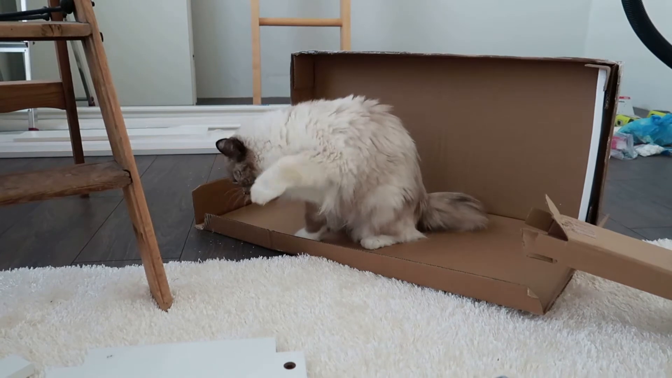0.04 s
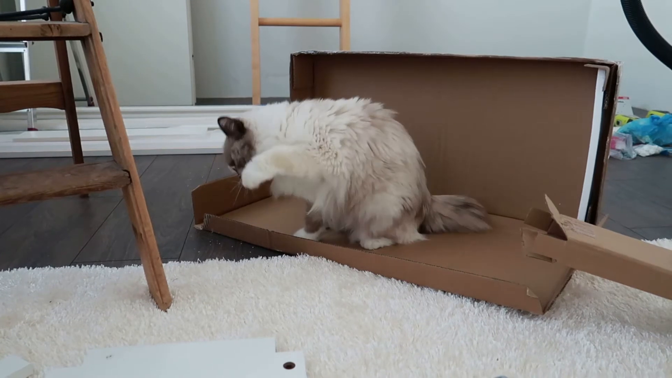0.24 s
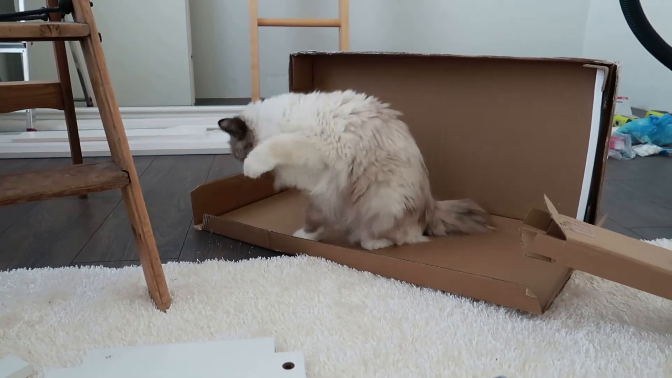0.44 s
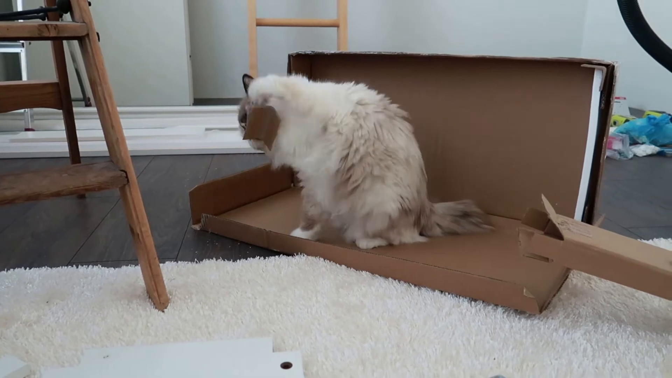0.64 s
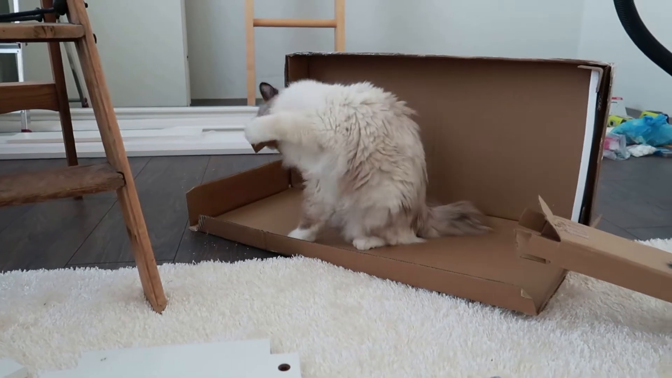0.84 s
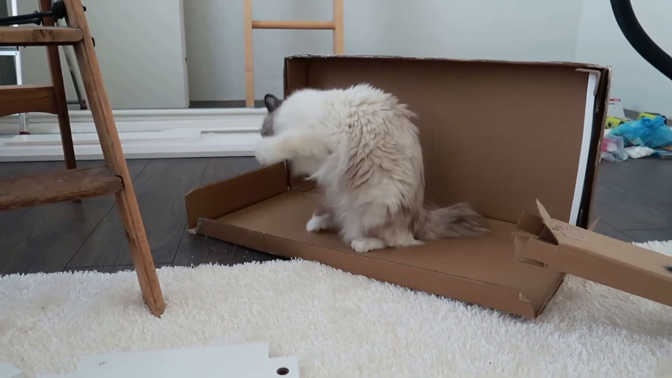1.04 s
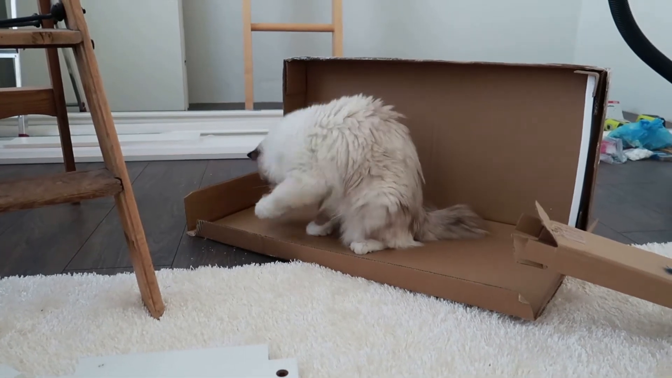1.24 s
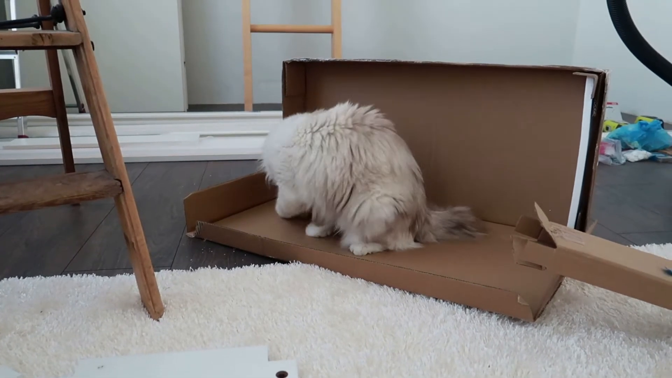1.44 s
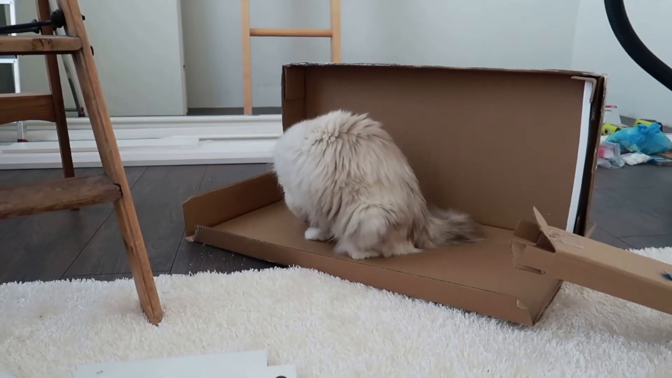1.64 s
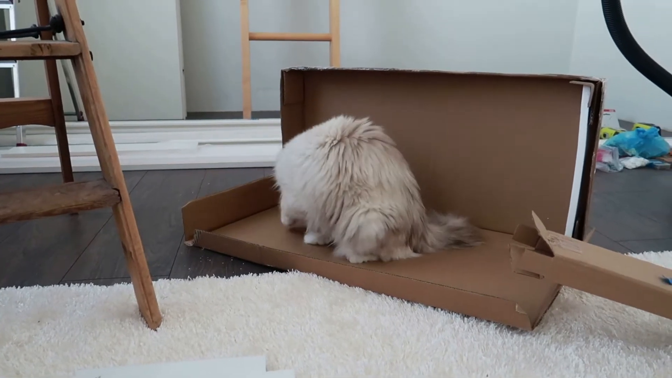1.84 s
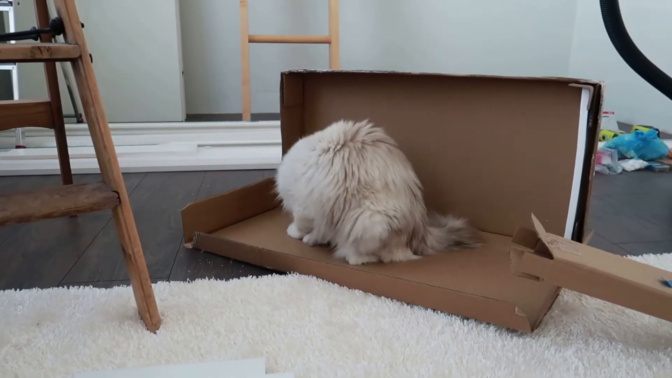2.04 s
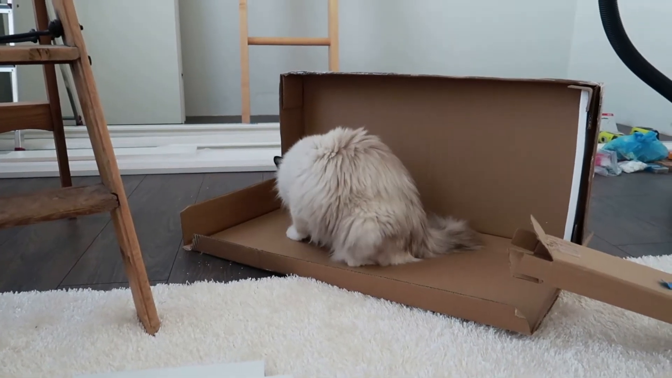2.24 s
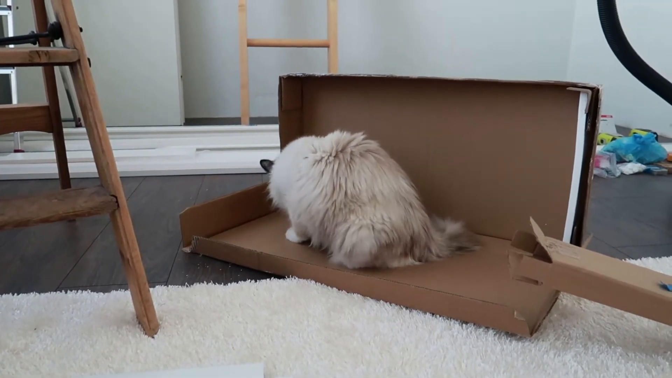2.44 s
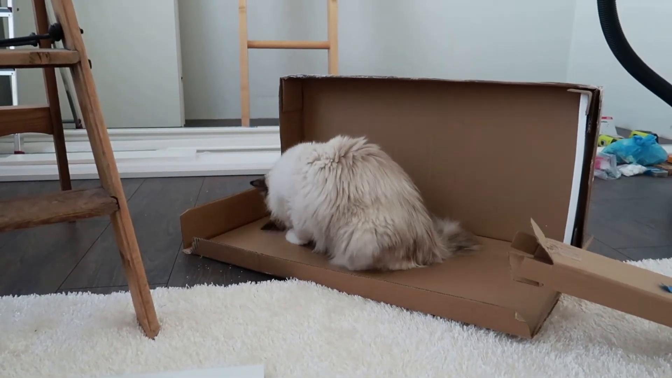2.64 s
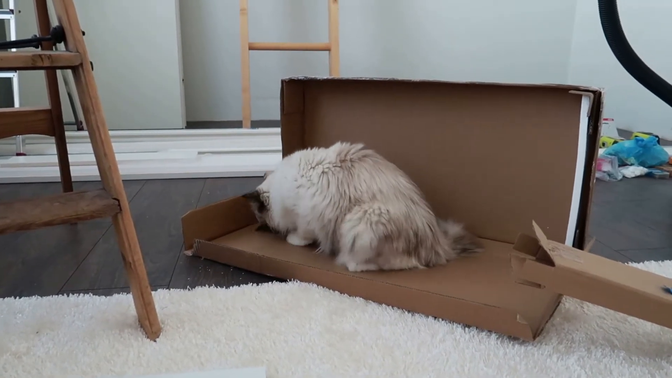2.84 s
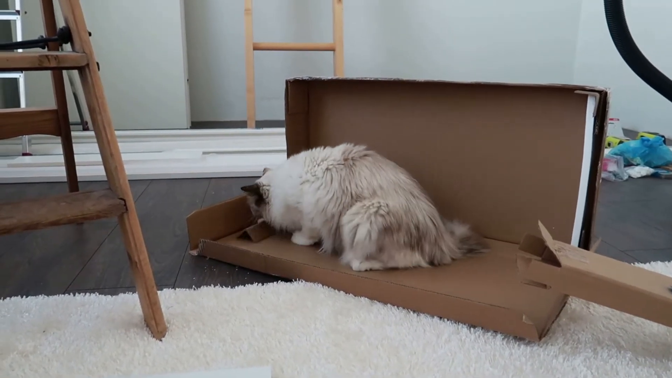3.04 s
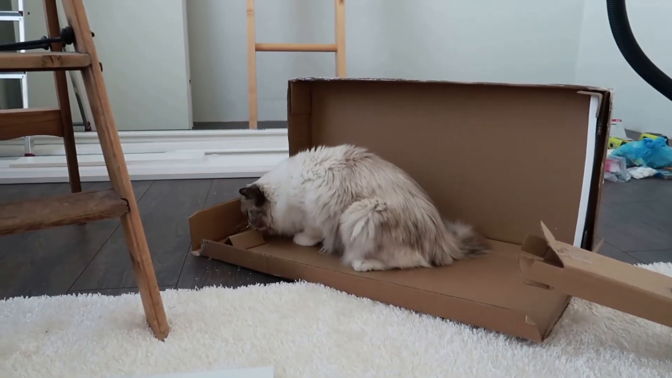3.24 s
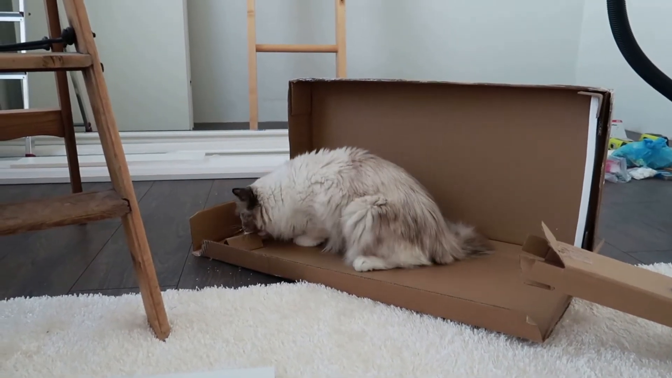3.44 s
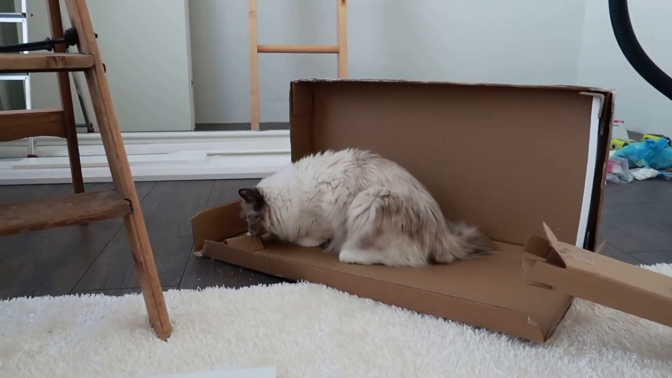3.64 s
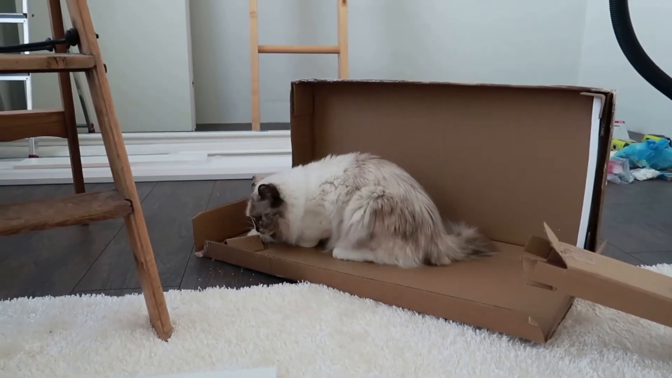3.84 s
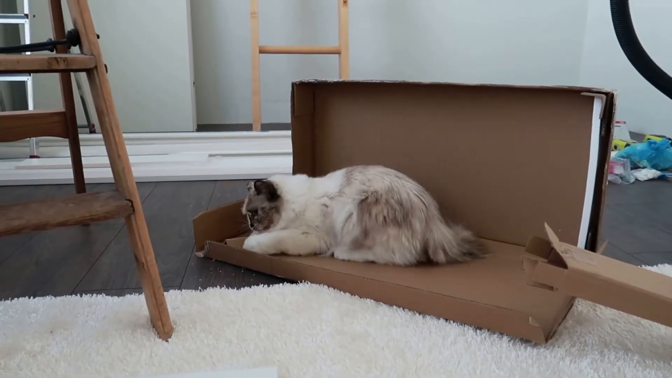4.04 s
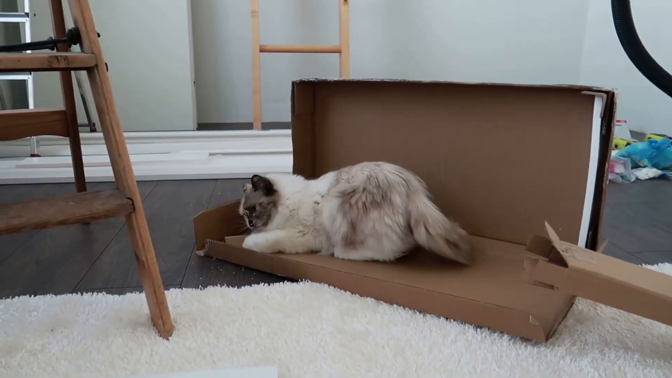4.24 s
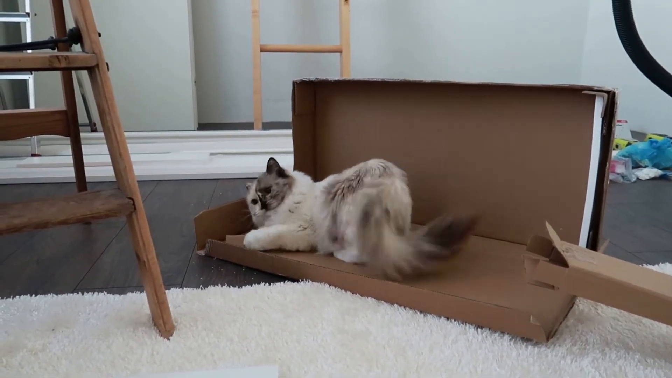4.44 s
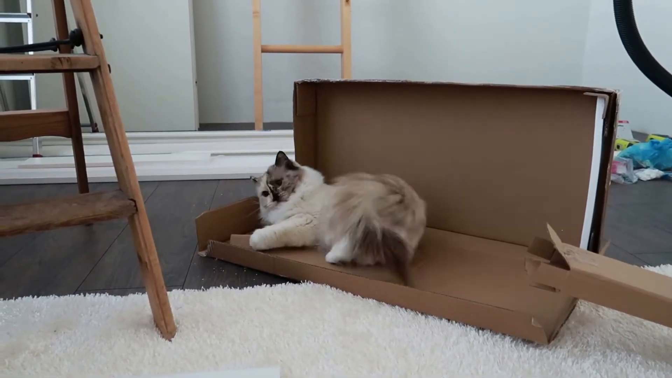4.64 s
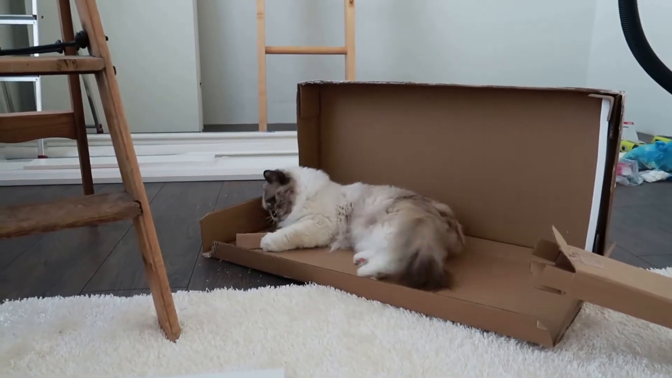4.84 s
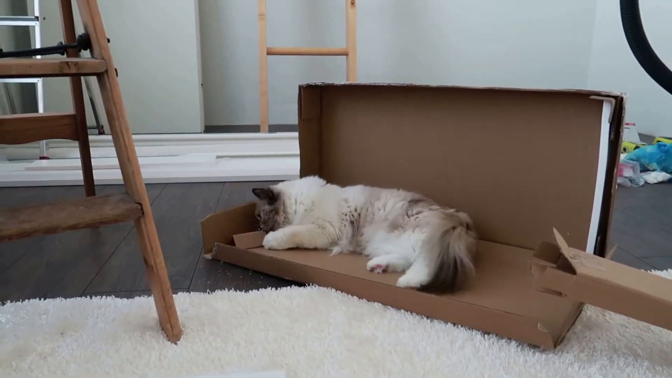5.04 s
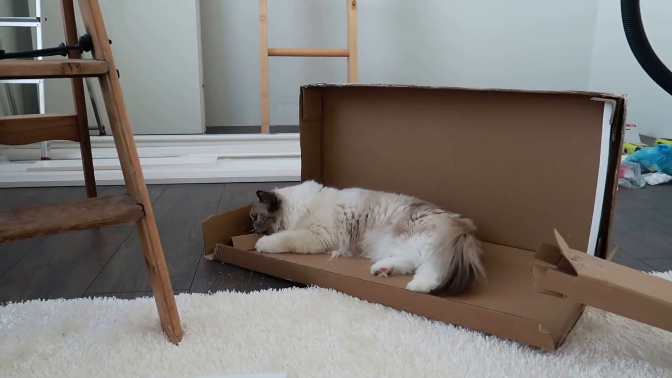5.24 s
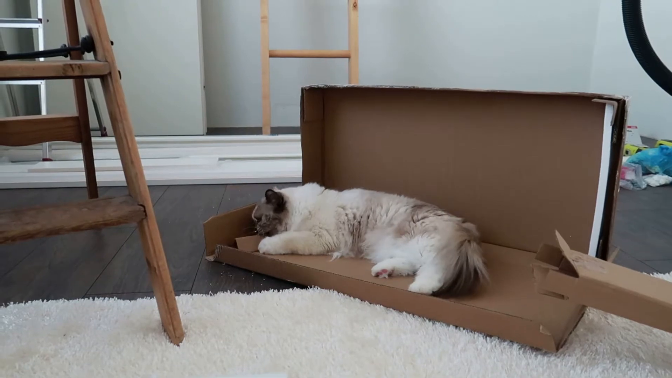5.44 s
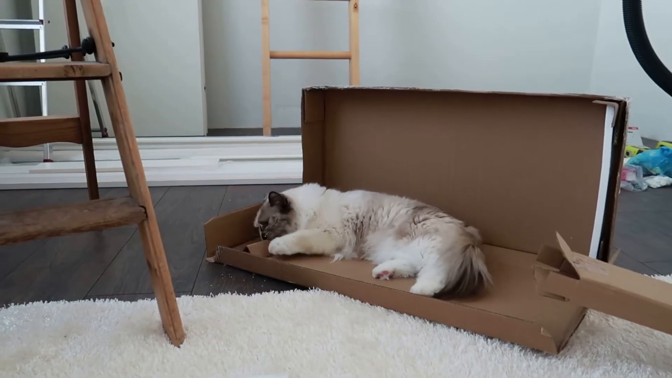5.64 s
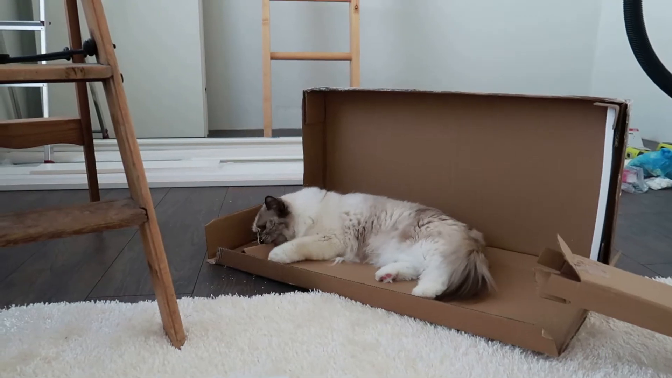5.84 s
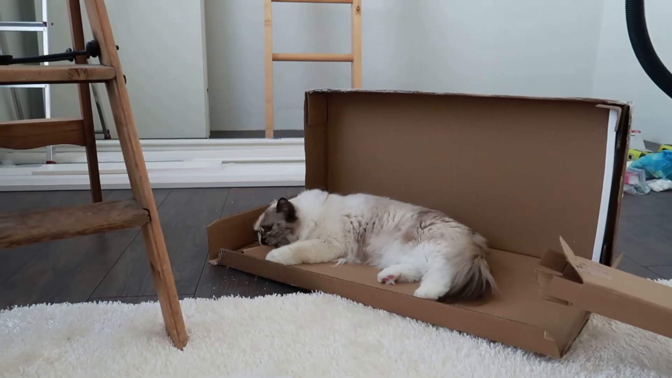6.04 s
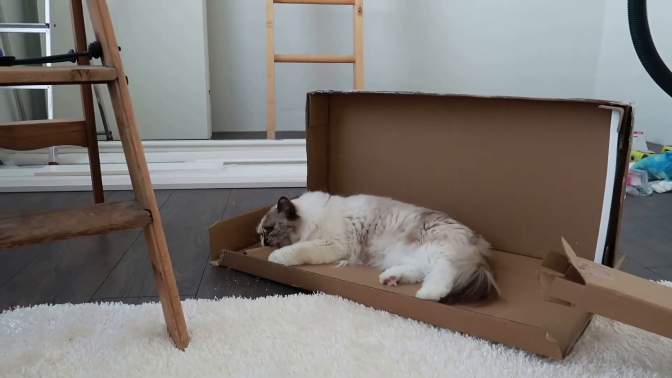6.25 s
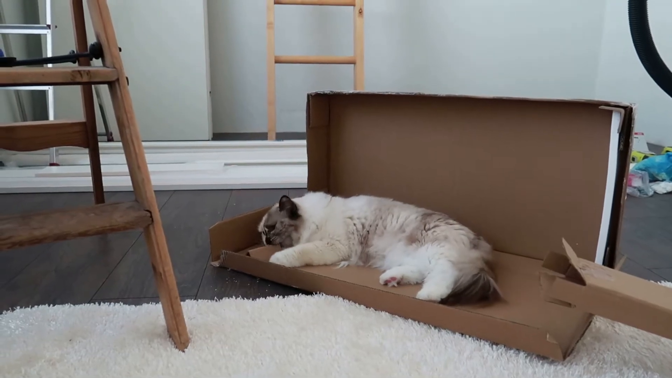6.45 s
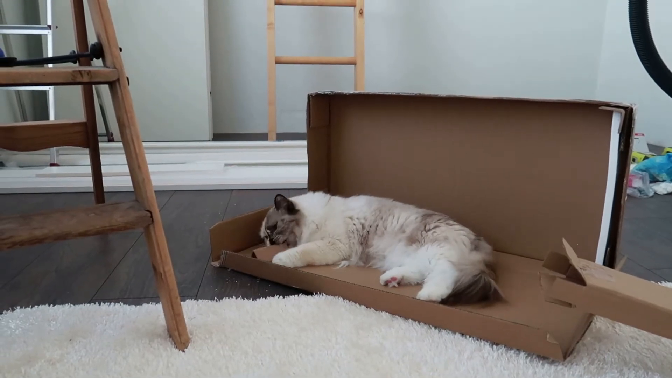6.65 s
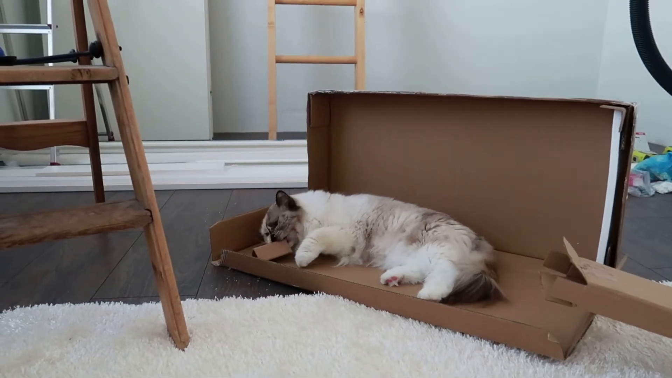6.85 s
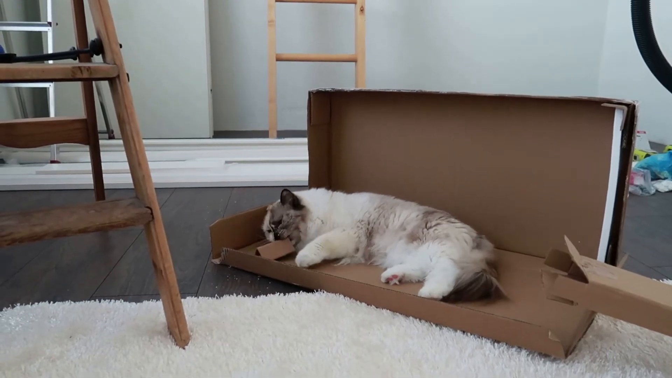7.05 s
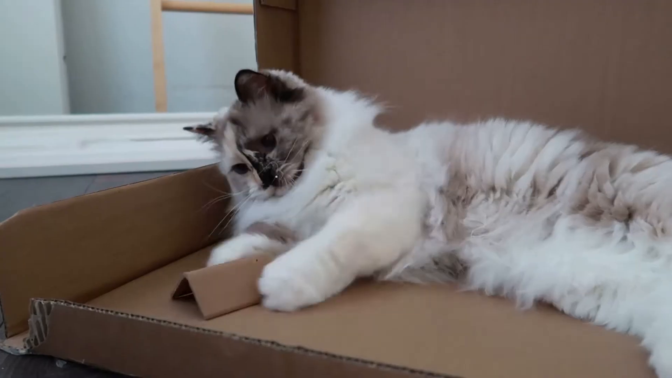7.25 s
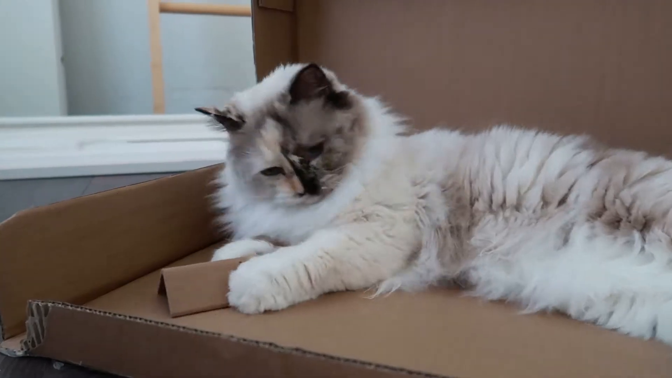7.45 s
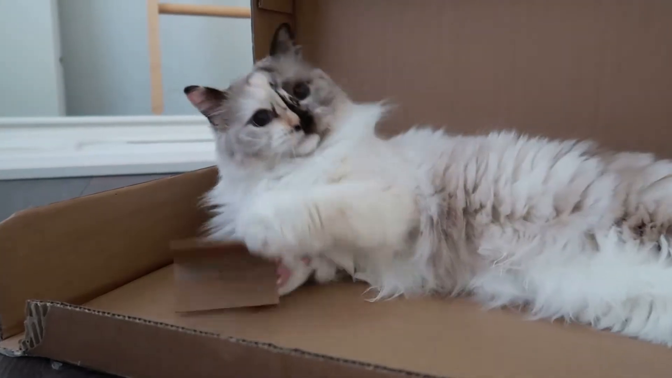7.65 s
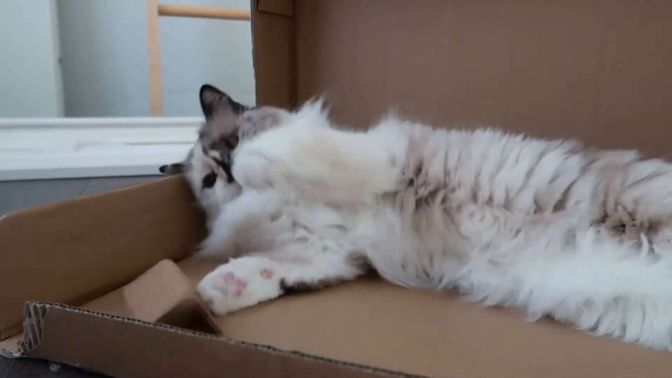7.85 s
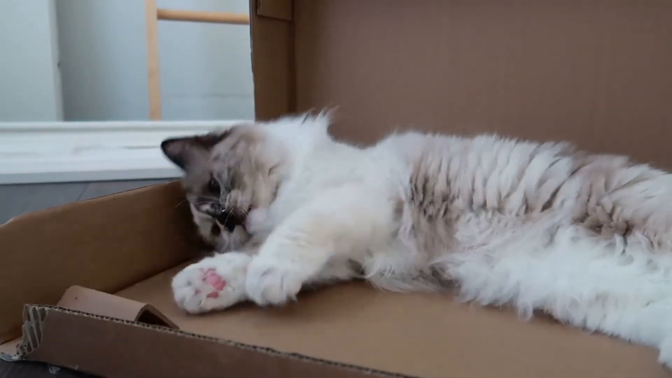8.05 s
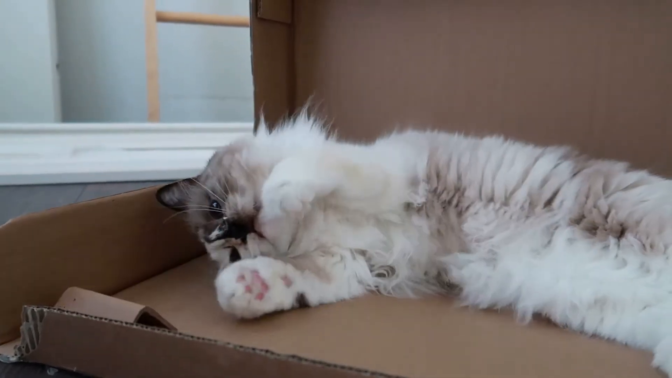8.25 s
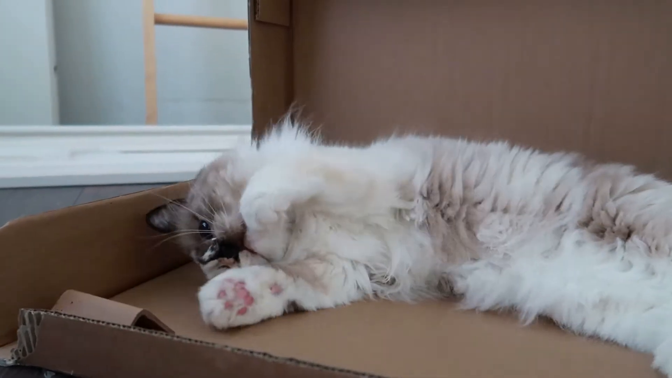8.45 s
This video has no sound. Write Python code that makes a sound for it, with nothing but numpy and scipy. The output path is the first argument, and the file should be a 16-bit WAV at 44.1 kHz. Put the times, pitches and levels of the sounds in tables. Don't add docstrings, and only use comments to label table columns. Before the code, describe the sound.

Loose cardboard clatters sharply near the start and end, with quiet papery scuffs and claw ticks between, over faint room air and mains hum.

```python
import sys
import numpy as np
from scipy import signal
from scipy.fft import rfft, irfft, next_fast_len
from scipy.io import wavfile
from scipy.ndimage import uniform_filter1d

SR = 44100
rng = np.random.default_rng(int(sys.argv[2]) if len(sys.argv) > 2 else 0)


def master(y):
    cut = np.clip(np.atleast_2d(y).T, -1, 1)
    pcm = np.round(cut * 32767)
    wavfile.write(sys.argv[1], SR, pcm.astype(np.int16))


def field_ratio(decibels):
    return 10 ** (np.asarray(decibels, dtype=float) / 20)


N = 375222
T = np.arange(N) / SR
PAD = next_fast_len(N)
HZ = np.maximum(np.fft.rfftfreq(PAD, 1 / SR), 1)

# start in seconds, peak in dB, centre in Hz, crack in dB,
# level of the drag that follows in dB.
TICKS = [(0.7965, -34, 3070, -50, -45.5), (1.1413, -48, 2100, -55, -51), (2.0472, -39, 3060, -55, -37.5),
         (3.1469, -54, 2850, -44, -51), (3.4927, -52, 2060, -40, -40), (4.1704, -37.5, 1340, -48, -34.5),
         (4.1914, -42, 1460, -50, -37.5), (4.4861, -40, 2080, -53, -36), (4.7041, -37, 1362, -56, -35),
         (5.1220, -50, 2100, -46, -47), (5.3005, -36, 1520, -46, -36.5), (5.3010, -34, 3070, -60, -47),
         (6.115, -44.5, 1490, -58, -38.5), (6.6448, -47, 2070, -52, -45), (7.358, -22, 3750, -40, -38)]


def rms_one(x):
    return x / np.sqrt(np.mean(x ** 2) + 1e-20)


def at_hz(points, hz):
    table_hz, value = np.transpose(points)
    return np.interp(np.log(hz), np.log(table_hz), value)


def band(x, low_hz, high_hz):
    return signal.sosfilt(signal.butter(2, [low_hz, high_hz], "band", fs=SR, output="sos"), x)


def drift(rate):
    knots = rng.standard_normal(int(N / SR * 60))
    return np.interp(T * rate, np.arange(len(knots)), knots) * 0.8


def spread(mid, side, colour_db, width):
    mid = rfft(mid, PAD) * field_ratio(colour_db)
    side = rfft(side, PAD) * field_ratio(colour_db + at_hz(width, HZ))
    return np.array([mid + side, mid - side])


def layers(spectra, centres_hz):
    shares = [np.interp(np.log(HZ), np.log(centres_hz), one) for one in np.eye(len(centres_hz))]
    return [irfft(spectra * share, PAD)[:, :N] for share in shares]


def grains(per_s, uneven_db):
    size = field_ratio(uneven_db * np.minimum(rng.exponential(1, N), 5)) * rng.choice([-1, 1], N)
    return size * (rng.random(N) < per_s / SR)


def add_contact(power, layer_laws, start, rise, hold, pressure_db, bright_db):
    swell_db = 17
    i = int(start * SR)
    t = T[:min(SR, N - i)]
    rise_db = np.minimum(swell_db * (t / max(rise, 1e-3) - 1), 0)
    for row, (over_db, share, release) in zip(power, layer_laws):
        shape_db = np.minimum(rise_db, release * (rise + hold - t))
        row[i:i + len(t)] += field_ratio(2 * (pressure_db + over_db + share * bright_db + shape_db))


def contacts():
    # start in seconds, rise in seconds, hold in seconds, pressure in dB, brightness in dB.
    strokes = [(0.49, 0.059, 0.086, -73.5, 16), (2.391, 0.08, .01, -46, -0.5), (2.5, 0.13, 0.13, -45.5, 1),
               (2.872, 0.19, 0.12, -48.5, 4), (3.06, 0.17, 0.028, -46, 0.5),
               (3.433, 0.073, 0.05, -50.5, -2), (3.6, .1, 0.079, -64.5, 14.5), (3.868, 0.035, .01, -59, -6),
               (4.02, 0.036, .01, -58.5, -5), (4.4, 0.042, .02, -64.5, 19),
               (4.454, 0.068, 0.093, -51, -3.5), (4.584, 0.17, .01, -48.5, 1),
               (4.838, 0.097, 0.071, -43.5, -1), (5.048, 0.092, .01, -48, -1.5),
               (5.292, 0.062, 0.011, -49.5, -30), (5.485, 0.12, 0.18, -48.5, -1),
               (6.054, 0.13, 0.013, -52.5, -13), (6.598, 0.05, 0.026, -48, -5.5),
               (7.125, 0.017, .03, -44, -8), (7.143, 0.038, 0.0076, -41.5, -6.5),
               (7.2, 0.024, .005, -41.5, -1), (7.266, 0.042, 0.17, -62, 12),
               (7.549, 0.093, .02, -46.5, 2.5), (7.655, 0.033, .005, -46.5, 10.5)]
    # start in seconds,
    # hold in seconds, pressure in dB, brightness in dB, panel pitch in Hz.
    skids = [(1.268, 0.071, -31.5, -1, 520), (1.398, 0.0086, -28, -9.5, 690), (1.53, 0.065, -35.5, 2, 695),
             (1.56, 0.1, -33.5, -0.5, 763), (1.67, 0.097, -53.5, 10.5, 622.7),
             (7.345, 0.0059, -42.5, 20.5, 695), (7.35, 0.0096, -57.5, 17.5, 693.4),
             (7.71, 0.024, -49, 14.5, 901), (7.888, 0.011, -39, 5, 503), (7.94, 0.039, -45, 17.5, 511.5),
             (8.0, .07, -46, 10.5, 610), (8.105, 0.088, -52, 13.5, 906)]
    # time in seconds, pitch in Hz.
    panel_path = [(0, 560), (2.0, 610), (2.44, 680), (2.6, 560), (2.8, 550), (3.03, 650), (3.4, 600),
                  (4.35, 580), (4.5, 660), (4.93, 750), (5.1, 640), (5.4, 520), (5.62, 715), (5.9, 575),
                  (6.4, 590), (6.67, 725), (6.9, 530), (7.3, 660)]
    # level over pressure in dB,
    # share of the brightness, release in dB per second.
    fur_laws = [(-1.7, 0.036, 120), (-4.5, 0.1, 77), (-6.5, 0.63, 144), (-6.5, 0.79, 131)]
    # level over pressure in dB, share of the brightness, release in dB per second.
    card_laws = [(3, 0.15, 350), (-2.8, 0.84, 190), (-11.5, 0.77, 570), (-17, 0.92, 230)]
    # level over pressure in dB, share of the brightness, release in dB per second.
    claw_laws = [(-21.5, 0.05, 150), (-15.5, .3, 120), (-20.5, .8, 200), (-23, 1.01, 140)]
    resting_db = [-77.5, -76, -78, -75]
    snap_s, claw_drag_s = 0.0013, 0.0033

    power = np.outer(field_ratio(resting_db) ** 2, np.ones(N))
    panel_hz = np.interp(T, *np.transpose(panel_path))
    for stroke in strokes:
        add_contact(power, fur_laws, *stroke)
    for s, *_, drag_db in TICKS:
        add_contact(power, claw_laws, s, snap_s, claw_drag_s, drag_db, 0)
    for s, hold, pressure_db, bright_db, hz in skids:
        add_contact(power, card_laws, s, snap_s, hold, pressure_db, bright_db)
        panel_hz[(T >= s) & (T < s + hold + 0.1)] = hz
    return uniform_filter1d(np.sqrt(power), size=120), panel_hz


def sliding():
    # frequency in Hz, level in dB per Hz.
    rub_colour = [(71, -41), (120, -12), (128, -15), (319, 1), (432, -9), (563, -12), (796, -4.5),
                  (975, -12), (1790, -3.5), (2070, -2.5), (2390, -1.5), (12100, -29.5), (15500, -36.5)]
    # centre in Hz, width in Hz, height in dB.
    board_peaks = [(1330, 140, 4), (2061, 83, 8.5), (2790, 26, -0.5), (3114, 220, 5.5), (3660, 290, 8),
                   (4380, 53, 9), (4980, 69, 5.5), (5710, 110, 7.5), (6340, 200, 5.5), (6900, 90, 6.5)]
    # frequency in Hz, side minus mid in dB.
    rub_width = [(100, -28), (300, -17), (700, -14.5), (1290, -18), (2380, -14.5), (4400, -9.5),
                 (8120, -5.5), (15000, 5)]

    gains, panel_hz = contacts()
    peaks_db = sum(db / (1 + (2 * (HZ - hz) / width) ** 2) for hz, width, db in board_peaks)
    fibres = grains(6000, uneven_db=2.5), grains(6000, uneven_db=2.5)
    rub = spread(*fibres, at_hz(rub_colour, HZ) + peaks_db, rub_width)
    low, *upper = map(rms_one, layers(rub, [800, 1750, 3600, 5300]))
    slow = band(rng.standard_normal((2, N)), 15.3, 73)
    phase = 2 * np.pi * np.cumsum(panel_hz) / SR
    panel = rms_one(slow[0] * np.cos(phase) + slow[1] * np.sin(phase))
    low = rms_one(low + field_ratio(-1.0) * panel)
    grip = drift(25)
    waver = [field_ratio(1.1 * grip + 1.3 * drift(14)) for _ in gains]
    return sum(g * w * x for g, w, x in zip(gains, waver, (low, *upper)))


def ring(clicks, hz, t60):
    r, w = field_ratio(-60 / (t60 * SR)), 2 * np.pi * hz / SR
    return signal.lfilter([0, np.sin(w)], [1, -2 * r * np.cos(w), r * r], clicks + 1e-18)


def strike(times, centres, falloff_db, cycles, box_db):
    # frequency in Hz, level in dB, time to fall 60 dB in seconds.
    modes = [(167, -22, 0.033), (213, -15, 0.033), (320, 4.5, 0.015), (373, 10, 0.014), (454, 10, 0.025),
             (537, 7.5, 0.025), (613, 4.5, 0.026), (740, 7, 0.024), (844, -0.5, 0.074), (917, 2, 0.02),
             (960, 1.5, 0.023), (1390, 1, 0.0043), (1656, 3, 0.022), (1646, 6.5, 0.011),
             (1930, 10.5, 0.013), (2080, 10.5, 0.0047), (2450, -4, 0.017), (2620, -2, 0.017),
             (3070, -1, 0.026), (3510, -21, 0.0033), (3510, -10, 0.012), (4370, -24, 0.0025)]
    at, out = np.round(times * SR).astype(int), np.zeros(N)
    luck = field_ratio(2.5 * rng.standard_normal((len(at), len(modes))))
    for k, (hz, db, t60) in enumerate(modes):
        height = 0
        for c_db, c_hz in centres:
            octaves_off = abs(np.log2(hz / c_hz))
            height = height + field_ratio(c_db + db + box_db - falloff_db * octaves_off)
        clicks = np.zeros(N)
        clicks[at] = height * luck[:, k]
        out += ring(clicks, hz, t60) * (-1) ** k
    t = T[:4000]
    for (c_db, c_hz), turns in zip(centres, cycles):
        for i, db, hz in zip(at, c_db, c_hz):
            out[i:i + len(t)] -= field_ratio(db - 60 * t * hz / turns) * np.sin(2 * np.pi * hz * t)
    return out


def crack(times, peak_db):
    clicks = np.zeros(N)
    clicks[np.round(times * SR).astype(int)] = field_ratio(peak_db)
    decay = field_ratio(-60 / (0.007 * SR))
    puff = signal.lfilter([1], [1, -decay], clicks + 1e-18) * rng.standard_normal(N)
    edge = -3 * clicks + 0.45 * puff
    return signal.sosfilt(signal.butter(1, [700, 3600], "band", fs=SR, output="sos"), edge)


def knocks():
    # start in seconds, thud in dB, thud centre in Hz,
    # clack in dB, clack centre in Hz.
    on_edge = [(1.2656, -16.5, 270, -19, 1930), (7.3428, -26.5, 1070, -27.5, 1800),
               (7.887, -17, 319, -15.5, 1650), (7.945, -15.5, 285, -22.5, 1000),
               (7.9585, -13, 317.4, -20, 1390), (7.976, -19, 356, -28, 1760),
               (7.9837, -27.5, 373, -23, 1560), (8.0674, -36, 604, -30.5, 1170),
               (8.07, -25, 410, -42, 1700), (8.0955, -32.5, 159.5, -18, 1100)]
    # start in seconds, thud in dB, thud centre in Hz,
    # clack in dB, clack centre in Hz.
    flat = [(1.2722, -16.5, 390, -19.5, 1060), (1.3986, -26, 294, -35, 1930),
            (1.4736, -23.5, 437, -38, 2700), (1.5250, -28.5, 503, -33, 2000),
            (1.5670, -13.5, 589, -43, 800), (7.233, -37.5, 674, -39, 1420),
            (7.3730, -35.5, 390, -32.5, 1390), (7.4050, -39.5, 740, -51, 2000),
            (8.1006, -9, 1700, -18.5, 1330)]
    edge_crack_db, flat_crack_db = 5, -2
    s, thud_db, thud_hz, clack_db, clack_hz = np.transpose(np.vstack([on_edge, flat]))
    over_db = np.repeat([edge_crack_db, flat_crack_db], [len(on_edge), len(flat)])
    crack_db = np.maximum(thud_db, clack_db) + over_db
    centres = [(thud_db + 9, thud_hz), (clack_db + 10.0, clack_hz)]
    body = strike(s, centres, falloff_db=14.5, cycles=[15.0, 15.0], box_db=-5.0)
    return band(body + crack(s, crack_db + 10.5), 130, 5700)


def ticks():
    s, peak_db, hz, crack_db, _ = np.transpose(TICKS)
    body = strike(s, [(peak_db + 1.5, hz)], falloff_db=1, cycles=[40.0], box_db=-17)
    return band(body + crack(s, crack_db - 6), 1320, 5500)


def thumps():
    # start in seconds, level in dB, pitch in Hz.
    pushes = [(1.27, -42, 59.7), (1.483, -12.5, 280), (3.146, -30.5, 465), (3.9, -45, 200),
              (4.492, -33, 160), (6.718, -33, 168), (7.23, -63, 165), (7.391, -42, 100), (7.93, -30, 45),
              (8.02, -42, 40)]
    rise_cycles, fall_cycles = 0.8, 5.7
    out, t = np.zeros(N + SR), T[:SR // 2]
    for s, db, hz in pushes:
        shape = field_ratio(db - 60 * t * hz / fall_cycles) * (1 - np.exp(-t * hz / rise_cycles))
        out[int(s * SR):][:len(t)] += shape * np.sin(2 * np.pi * hz * t) * 2
    return out[:N]


def room(x):
    # frequency in Hz, time to fall 60 dB in seconds.
    decay = [(100, 0.15), (250, 0.45), (600, 0.68), (1400, 0.6), (2800, 0.66), (5000, 0.21), (12000, 0.27)]
    # frequency in Hz, level in dB.
    colour = [(100, 18.5), (300, 5.5), (1000, 3), (2500, -0.5), (5000, 4), (12000, -12.5)]
    # frequency in Hz, side minus mid in dB.
    tail_width = [(100, -64), (500, -41), (1000, -36), (2000, -43.5), (4000, -6), (8000, 15.5),
                  (14000, 18.5)]
    # delay in seconds, spread in seconds, level in dB.
    wall_echo = (.031, .008, 5)
    delay, echo_spread, echo_db = wall_echo
    noise = spread(*rng.standard_normal((2, N)), at_hz(colour, HZ), tail_width)
    t, (centres_hz, t60) = T[:SR], np.transpose(decay)
    tail = sum(part[:, :SR] * field_ratio(-60 * t / d) for part, d in zip(layers(noise, centres_hz), t60))
    tail = tail * (1 - np.exp(-(t / 0.017) ** 2))
    tail = tail * field_ratio(echo_db * np.exp(-((t - delay) / echo_spread) ** 2))
    return signal.fftconvolve(x[None], tail / np.sqrt(np.sum(tail[0] ** 2)), axes=1)[:, :N]


def room_air(blows):
    # frequency in Hz, level in dB per Hz.
    air_colour = [(13, -43), (22, -31), (47, 1), (102, -4.5), (121, -5), (150, -2.5), (324, -7.5),
                  (450, -8.5), (516, -13), (846, -15), (1550, -19.5), (4270, -26.5), (12400, -41.5),
                  (15500, -51)]
    # frequency in Hz, side minus mid in dB.
    air_width = [(60, -20), (110, -6.5), (200, -3), (380, 1.5), (700, -0.5), (1290, 0.5), (2380, 0.5),
                 (4400, -2), (8120, -2.5), (15000, -1)]
    air_db, duck_db, duck_above_db, recover_s = -51, 3.5, -27.5, 1
    noise = spread(*rng.standard_normal((2, N)), at_hz(air_colour, HZ), air_width)
    air = rms_one(irfft(noise, PAD)[:, :N])
    hold = np.exp(-1 / (recover_s * SR))
    loud = signal.lfilter([1 - hold], [1, -hold], blows ** 2) / field_ratio(duck_above_db) ** 2
    return field_ratio(air_db - duck_db * loud ** 2 / (1 + loud ** 2)) * air


def hum():
    # time in seconds, level in dB.
    hum_path = [(0, -61.5), (1.2, -65), (1.8, -58.5), (3, -56), (4, -55.5), (5, -54.5), (5.6, -54.5),
                (7.1, -58), (7.2, -72), (8.51, -84)]
    # multiple of the line rate, level in dB.
    other_tones = [(1, -65.5), (3, -64.5), (4, -75)]
    mains_hz = 50.05
    phase = 2 * np.pi * mains_hz * T
    others = sum(field_ratio(level_db + 1.4 * drift(2.01)) * np.sin(m * phase) for m, level_db in other_tones)
    main_db = np.interp(T, *np.transpose(hum_path)) + 0.64 * drift(14)
    return np.sqrt(2) * (field_ratio(main_db) * np.sin(2 * phase) + others)


def scene():
    rub, blows, taps = sliding(), knocks(), ticks()
    hits = blows + taps
    lagged = np.interp(np.arange(N) - 1.2, np.arange(N), hits)
    direct = np.array([hits * field_ratio(-1.46), lagged * field_ratio(-1.9)])
    upper = signal.sosfilt(signal.butter(2, 2100, "high", fs=SR, output="sos"), direct)
    lean = field_ratio(np.array([[0.5], [-0.5]]) * 1.5)
    direct = direct + upper * (lean - 1) + thumps()
    wet = room(field_ratio(-9.5) * blows + field_ratio(0.5) * taps + field_ratio(-7) * rub.mean(0))
    return direct + wet + rub + room_air(blows) + hum()


def band_limit(x):
    return signal.sosfilt(signal.butter(12, 15770, fs=SR, output="sos"), x)


def record(dry):
    rounded = 1.236 * np.tanh(dry / 1.317)
    mix = signal.sosfilt(signal.butter(2, 24, "high", fs=SR, output="sos"), rounded)
    return band_limit(mix)


dry = scene()
out = record(dry)
master(out)
```